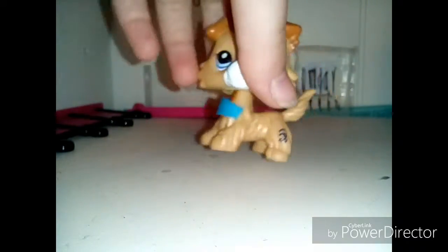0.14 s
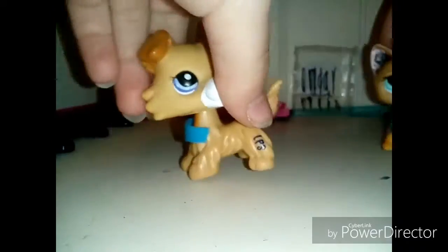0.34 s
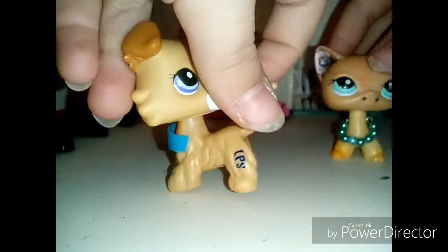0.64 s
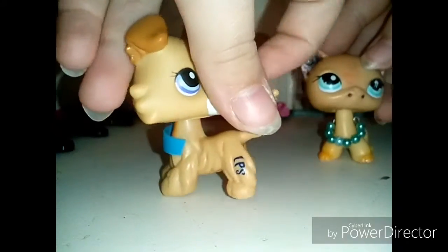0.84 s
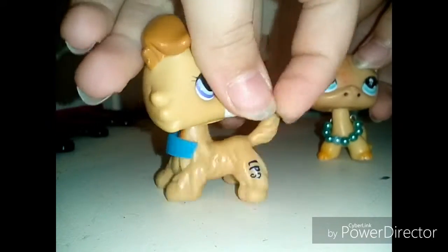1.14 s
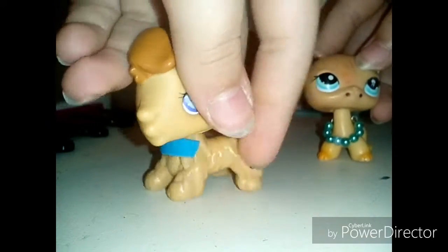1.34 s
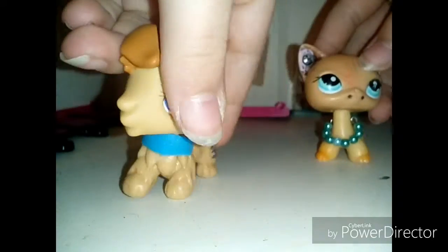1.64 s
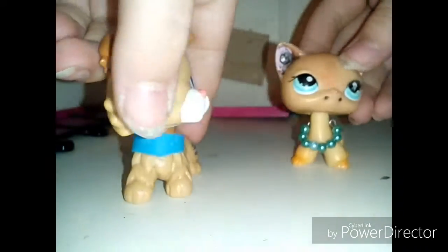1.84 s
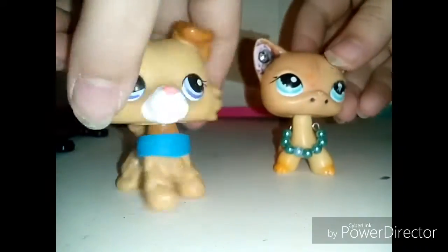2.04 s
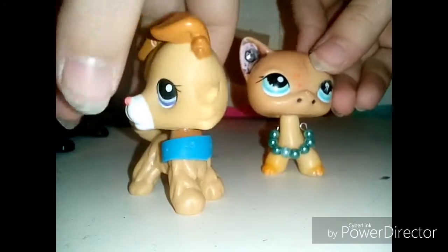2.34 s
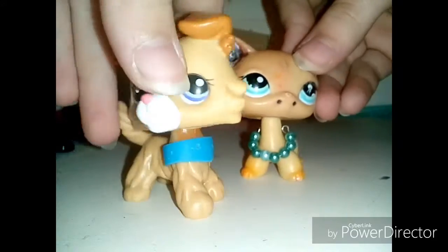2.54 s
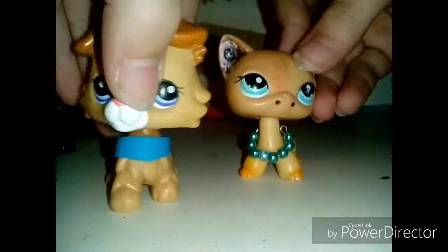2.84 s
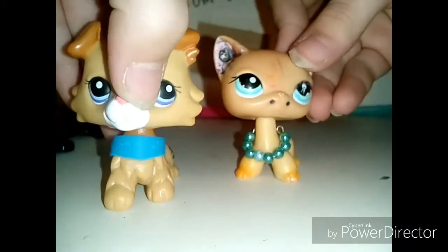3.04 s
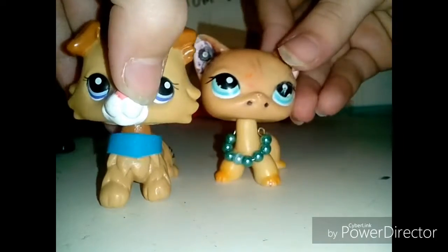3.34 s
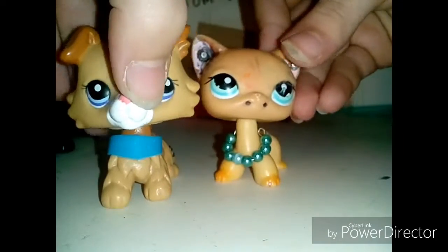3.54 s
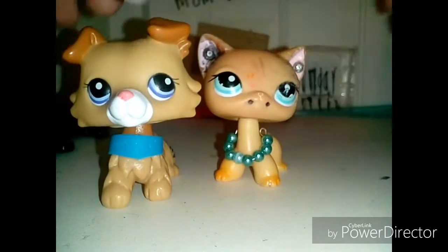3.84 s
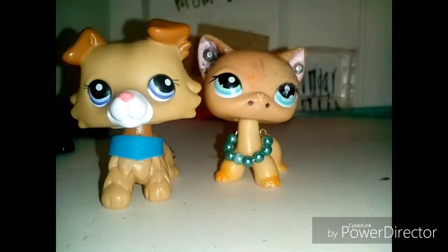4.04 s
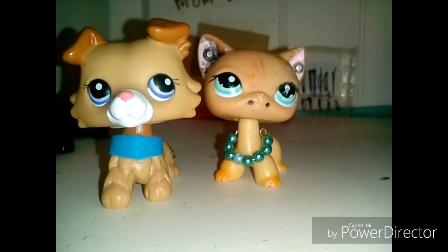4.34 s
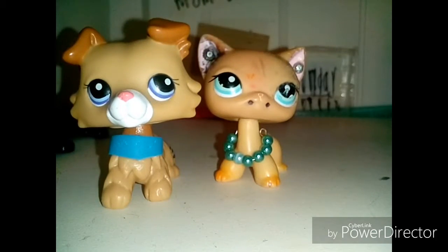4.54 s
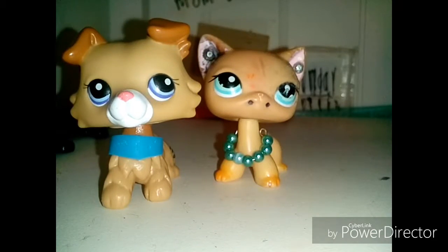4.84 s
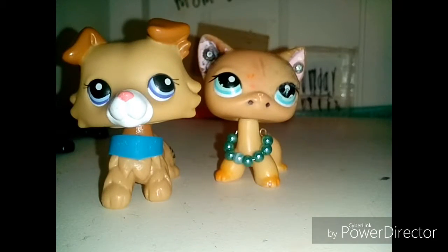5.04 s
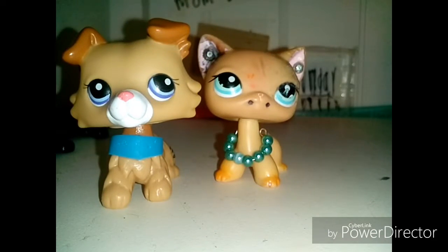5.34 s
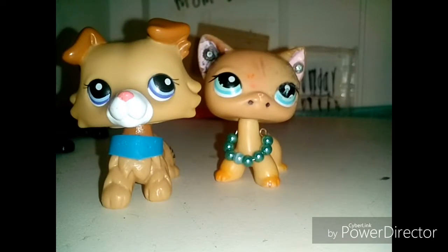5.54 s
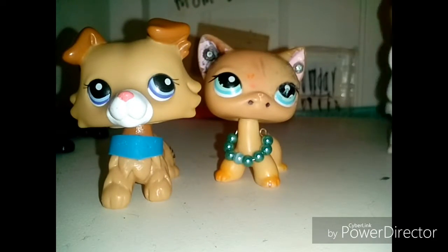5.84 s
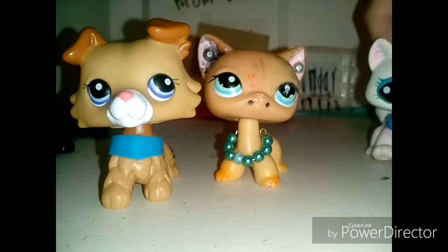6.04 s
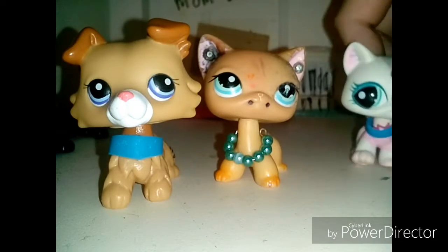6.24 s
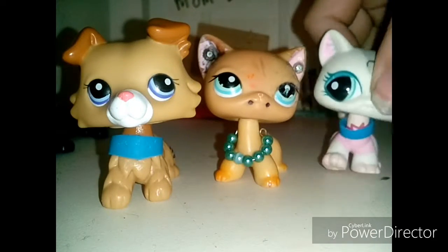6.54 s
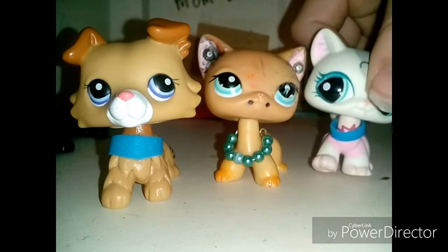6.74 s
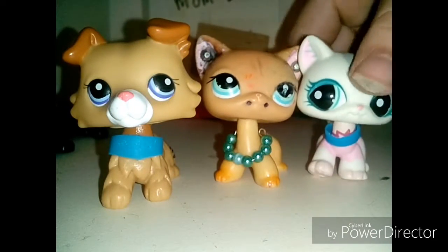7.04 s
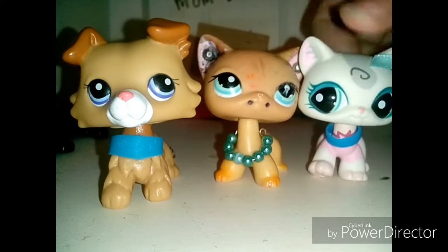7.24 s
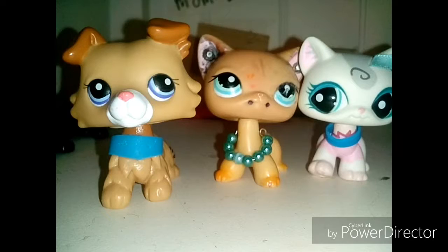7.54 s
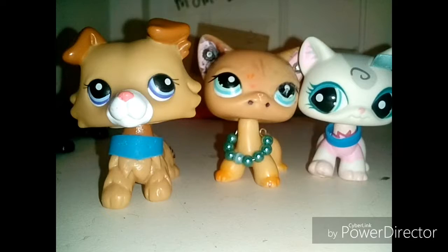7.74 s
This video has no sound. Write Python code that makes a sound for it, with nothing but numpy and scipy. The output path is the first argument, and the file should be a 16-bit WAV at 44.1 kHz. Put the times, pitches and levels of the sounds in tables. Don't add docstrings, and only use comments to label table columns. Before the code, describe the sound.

A small, fairly dry room with low fridge-like hum and faint hiss, captured close by a two-port phone. From 0 to 0.7 s, hard hollow plastic toy feet strike a hollow shelf in loud bright clacks, the strongest near 0.06, 0.2 and 0.65 s, with gritty scraping between. From 0.8 to 2.2 s come lighter steps, shuffles and drags, with a clear clack at 1.3 s. Firmer knocks fall around 2.3 s, then muffled taps and rubs until 3 s. It quiets, with a knock at 3.7 s. At 4.2-4.4 s a hand lands in a dull, soft slap and brushes away. Small taps and tiny bead-like flicks follow at 4.6-5.1 s. A solid clack at 5.65 s leads to light plastic taps through 6.9 s, then near-silence with faint rubbing and very faint high insect trills.

```python
import sys
import numpy as np
from scipy import signal
from scipy.fft import rfft, irfft, next_fast_len
from scipy.io import wavfile
from scipy.ndimage import uniform_filter1d

SR = 44100
rng = np.random.default_rng(int(sys.argv[2]) if len(sys.argv) > 2 else 0)


def field_ratio(decibels):
    return 10 ** (np.asarray(decibels, dtype=float) / 20)


def persist_wave(psi):
    counts = np.round(np.clip(psi, -1, 1) * 32767).astype(np.int16)
    wavfile.write(sys.argv[1], SR, np.atleast_2d(counts).T)


N = 347508
TIME = np.arange(N) / SR
SPOT_DB = 2.5

# pitch_hz, level_db, t60_s
BOARD = [(122, -19.5, 0.24), (252.2, 5.5, 0.11), (314.7, -2.5, 0.35), (376.6, 8.5, 0.14), (402.1, 5, 0.2),
         (473, -9, 0.045), (640, -4.5, 0.19), (714, -2.5, 0.092), (860, 1.5, 0.023), (1000, -14.5, 0.055),
         (1089, -1, .06), (1250, -18, 0.036), (1366, -27.5, 0.036), (1660, -3, 0.064), (1923, -4, 0.1),
         (2140, -9.5, 0.047), (2430, -22, 0.04), (2519, -18, 0.055), (2600, -9, 0.096), (3600, -9.5, 0.033),
         (3820, 4, 0.025), (4320, -2, 0.018), (5050, 10, 0.017), (5303, -1, 0.028), (5570, -16, .025)]
COLOUR_HZ = (380, 950, 2200, 4500)
# pitch_hz, width_hz, level_db
BIG_HEAD = [(1013, 86, 7.5), (1624, 47, -8), (1880, 63.5, -12.5), (2200, 70, -19), (2840, 43, -5),
            (3707, 72, -5), (5150, 210, -11)]
SMALL_HEAD = [(635, 30, 1), (870, 39, 2), (1270, 60, -7.5), (1910, 60, 1.5), (2250, 54, -1),
              (2810, 120, -14), (3315, 70, -13), (3700, 90, -14)]
SLEEVE = [(1250, 41, -6.5), (1927, 34, 2), (2850, 140, 0), (3310, 90, -9), (3890, 80, -13), (4630, 100, 4),
          (4950, 92, -6.5), (5150, 160, -5)]


def unit(x):
    return x / np.sqrt(np.mean(x ** 2))


def colour(x, points):
    hz, db = np.transpose(points)
    n = next_fast_len(N)
    bins = np.maximum(np.fft.rfftfreq(n, 1 / SR), 1)
    gain = field_ratio(np.interp(np.log(bins), np.log(hz), db))
    return irfft(rfft(x, n) * gain, n)[..., :N]


def band(x, lo_hz, hi_hz):
    return signal.sosfilt(signal.butter(2, (lo_hz, hi_hz), "bandpass", fs=SR, output="sos"), x)


def steep(x, lo_hz, hi_hz):
    return band(band(x, lo_hz, hi_hz), lo_hz, hi_hz)


def resonance(x, hz, width_hz):
    return unit(signal.lfilter(*signal.iirpeak(hz, hz / width_hz, SR), x))


def walk(rate):
    k = int(SR / rate)
    held = np.repeat(rng.standard_normal(N // k + 1), k)
    return .55 * uniform_filter1d(uniform_filter1d(held, k), k)[:N]


def rings(hz, t60, t):
    return np.exp(np.outer(2j * np.pi * hz - np.log(1000) / t60, t))


def grip(t):
    return 0.25 + 0.75 * np.exp(-t / 0.05)


def touch_db(hz, four_db):
    return np.interp(np.log(hz), np.log(COLOUR_HZ), four_db)


def ports(x, s):
    # start_s, left_minus_right_db, left_lead_ms
    place = [(0, 1.5, 0.14), (.5, 5, 0.062), (0.999, 4, 0.28), (1.5, 4, 0.26), (2.301, 3.5, 0.3),
             (2.8, 1.5, 0.43), (3.202, 7, -0.42), (3.699, 1.5, 0.14), (4.3, -1.5, -0.28),
             (4.7, -2.5, -0.095), (5.2, -3, -0.043), (5.7, 7, 0.14), (6.3, 2, 0.072), (6.701, 3, 0.085),
             (7.501, -1, 0.24)]
    when, pan_db, lead_ms = np.transpose(place)
    pan_db = np.interp(s, when, pan_db)
    lag = np.interp(s, when, lead_ms) * SR / 2000
    at = np.arange(x.shape[1])
    return np.array([field_ratio(side * pan_db / 2) * np.interp(at + side * lag - 8, at, c)
                     for side, c in zip((1, -1), x)])


def quiet():
    # pitch_hz, level_db, side_db
    hum_tones = [
        (53.4, -61.5, -10.5),
        (15300, -102, -7),
    ]
    # pitch_hz, density_db
    air_colour = [(20, -22), (42, -27.5), (60, -11.5), (86, -18), (104, -7.5), (122, -6.5), (145, -16.5),
                  (250, -24.5), (450, -28), (1400, -35), (4200, -34.5), (5150, -31), (7900, -43),
                  (16000, -46)]
    mid, left, right = rng.standard_normal((3, N))
    shared = colour(mid, [(200, 3.0), (900, -11.0), (3000, -25.0)])
    alone = colour(np.array([left, right]), [(200, -4.0), (900, -0.5), (3000, -4.5)])
    air = colour(shared + alone, air_colour)
    air = air * field_ratio(-63) / np.std(band(air, 53, 16000))
    air = air * field_ratio(4.5 * walk(2.2) + 2.0 * walk(9))
    hum = np.zeros((2, N))
    for hz, db, side_db in hum_tones:
        phase = np.array([[field_ratio(side_db)], [-field_ratio(side_db)]])
        hum += field_ratio(db + .5 * walk(2.6)) * np.sqrt(2) * np.sin(2 * np.pi * hz * TIME + phase)
    return air + hum


def brushes():
    # centre_s, spread_s, level_db, low_hz, high_hz
    passes = [(4.3, .045, -43, 450, 1200), (2.903, .02, -45, 750, 1400), (4.21, .025, -72, 6500, 15000),
              (5.99, .015, -72, 6500, 14000), (2.19, .03, -76, 6500, 13000), (3.24, .02, -62, 280, 620),
              (1.065, .008, -64, 3400, 4000), (2.55, .03, -70, 4600, 5600), (7.44, .05, -76, 4500, 5600),
              (6.29, .025, -61, 4500, 5700), (2.9, .025, -78, 6500, 13000), (4.32, .05, -46, 100, 700),
              (.02, .015, -62, 2500, 6000), (3.95, .15, -62, 385, 420), (7.3, .12, -63, 250, 450),
              (4.29, .07, -66, 2550, 2720), (.46, .05, -44, 330, 470), (3.24, .03, -58, 250, 400),
              (7.8, .08, -78, 4800, 5500), (7.3, .025, -75, 4800, 5500), (.715, .015, -50, 500, 1500),
              (4.205, .022, -60, 4200, 6400), (1.2, .06, -68, 3620, 3800), (.22, .04, -58, 3000, 6000),
              (1.45, .1, -79, 2750, 2950), (.33, .05, -62, 1600, 1750), (5.99, .015, -58, 2300, 3200),
              (.95, .2, -64, 4900, 5500)]
    hiss, out = rng.standard_normal((2, N)) * field_ratio(3.7 * walk(25)), np.zeros((2, N))
    for s, spread, db, lo_hz, hi_hz in passes:
        near = slice(max(int((s - .25) * SR), 0), int((s + .25) * SR))
        swell = np.exp(-((TIME[near] - s) / spread) ** 2)
        out[:, near] += field_ratio(db) * swell * unit(steep(hiss[:, near], lo_hz, hi_hz))
    return out


def contacts():
    # start_s, peak_db, toy_ring_hz, hardness_db
    clacks = [(.057, -8.5, 2035, 5.5), (.066, -14, 831, -2.5), (.189, -7, 2680, 9.5),
              (.39, -19, 1950, -3.5), (.423, -13, 940.3, 3.5), (1.24, -41, 1030, -16),
              (1.319, -17, 1263, 4.5), (1.854, -47.5, 873, 0.5), (2.276, -13, 1100, -2.5),
              (2.352, -24, 1050, -9), (2.467, -31.5, 939, -5), (2.726, -24, 1026, -14.5),
              (2.878, -35.5, 1055, -13), (2.907, -28, 1078, -3.5), (3.711, -20, 710, -1),
              (4.713, -31.5, 1194, -13.5), (5.654, -15.5, 959, -1.5), (5.861, -28.5, 1790, -6),
              (6.113, -22, 1780, 0.5), (6.343, -30.5, 1960, -1), (6.366, -27.5, 1850, -11),
              (6.562, -33, 1880, -2), (6.606, -21, 1986, 0), (6.859, -53.5, 2220, 5)]
    steps = [(.153, -37, 640, 13), (.48, -32.5, 1050, 5), (.518, -24, 730, -6.5), (.654, -10, 1910, 15.5),
             (.872, -38, 1000, -9), (.989, -31, 1050, 1.5), (1.013, -39.5, 1040, -14),
             (1.218, -41.5, 1055, 0), (1.956, -46, 834, 7), (2.139, -42.5, 1010, -2.5),
             (2.185, -38, 1070, 7), (2.524, -51, 864, -15), (6.669, -36, 824, 0), (1.186, -35.5, 1110, 3),
             (1.349, -43, 877, -8), (1.878, -31.5, 1139, 12), (1.971, -33.5, 1020, -0.5),
             (2.744, -33, 783, -16), (2.893, -43, 1038, -7.5), (4.61, -35.5, 950, -6),
             (4.686, -44, 542, -6), (4.728, -49, 560, -17), (5.642, -16, 980, 6), (6.024, -30.5, 1785, 1.5),
             (6.096, -34.5, 880, -6), (6.209, -38, 860, 9), (6.246, -38, 1940, -6.5),
             (6.338, -32.5, 940, -23), (6.446, -41, 800, 6), (6.467, -33.5, 2090, -1),
             (6.68, -30.5, 1950, 4.5), (6.984, -57.5, 620, -7), (7.399, -62, 859, -2)]
    shuffles = [(.582, -34, 1000, 15.5), (.697, -27.5, 1250, 15), (.785, -52, 616, 14),
                (1.13, -43, 580, -2), (1.5, -39.5, 580, -5), (1.565, -42.5, 1015, -15),
                (1.594, -47.5, 1000, -9.5), (1.685, -37, 1054, 10.5), (1.699, -51, 861, 8),
                (2.097, -37, 1050, 0), (2.309, -36, 1020, 12), (2.44, -40.5, 840, 8),
                (2.638, -40.5, 566, -9), (2.672, -29, 1029, 11), (3.724, -25, 627, 20.5),
                (3.751, -32.5, 624, 16), (3.799, -37.5, 797, -5), (5.87, -35, 654, 16), (5.9, -43, 880, -6),
                (6.139, -36.5, 634, -5), (6.662, -44, 860, -2)]
    thumps = [(.836, -39.5, 710, 13), (1.217, -38.5, 560, 12), (2.004, -33, 1780, 15),
              (2.399, -32.5, 840, 17.5), (2.584, -37.5, 860, 17), (2.774, -38, 855, -16.5),
              (3.421, -39, 595, 0), (3.852, -42.5, 393, -2), (3.925, -46.5, 388, -2),
              (3.977, -48, 390, -8.5), (4.647, -42, 748, -1), (7.197, -50.5, 616, -3.5),
              (7.316, -55, 877, 13)]
    ticks = [(0.5, -37, 3730, 6), (2.284, -32, 600, 6.5), (1.06, -54, 3560, 12), (5.973, -43.5, 1030, 13),
             (5.985, -34.5, 510, 15.5)]
    slaps = [(4.237, -20.5, 337, 9), (4.243, -22, 580, 3), (4.266, -17.5, 593, -25), (4.299, -27, 370, -14),
             (4.311, -28.5, 580, -29), (4.325, -26, 344, -14), (4.351, -34, 370, -11),
             (4.372, -46, 293, -16)]
    # events, thud_db, bite_db, tick_db
    kinds = [(clacks, -9, -2.5, -9.5), (steps, -3, -7, -9.5), (shuffles, -7.5, -26, -28),
             (thumps, 7.4, -17.5, -26), (ticks, -0.5, -36, 0), (slaps, 11.6, -20, -46)]
    return sorted((s, db, hz, thud_db, bite_db + hard_db, tick_db + hard_db)
                  for rows, thud_db, bite_db, tick_db in kinds for s, db, hz, hard_db in rows)


def figure(toy_hz, t, colour_db, spot):
    # (pitch_hz, level_db, t60_s)
    figures = [(960, 1135, [(1047, 7.5, 0.031), (2806, 5, 0.033), (1320, -11, 0.012)]),
               (777, 939, [(656, 0, 0.03), (860, 2.5, 0.02), (1250, -6.5, 0.077), (1860, 2.5, 0.027),
               (2290, -0.5, 0.031)]), (1780, 2150, [(630.6, -4.5, 0.02), (860, -5.5, .06),
               (1250, -3.5, 0.044), (1884, 3.5, .04), (2233, 4.5, 0.029), (4200, 2, 0.016)]),
               (2600, 2750, [(1635, -5, .04), (2690, -2.5, 0.072), (4060, -2.5, 0.03), (5040, -3, 0.029)]),
               (1140, 1170, [(1440, 2, 0.037), (2780, -1.5, 0.025), (3400, 8.5, 0.019), (3950, 2, .02),
               (4720, -0.5, 0.02), (5000, -3, 0.028)]), (1262, 1295, [(858, 5, 0.034), (1612, 4.5, 0.03025),
               (2170, 6, 0.034), (2780, 10, 0.029), (3680, -10, 0.017), (4980, -0.5, 0.022)]),
               (3600, 3850, [(3700, 7.5, .07), (4400, 1, 0.063)])]
    for lo, hi, modes in figures:
        if lo <= toy_hz < hi:
            hz, db, t60 = np.transpose(modes)
            gain = field_ratio(db + SPOT_DB * spot[:len(hz)] + touch_db(hz, colour_db))
            return (gain @ rings(hz, t60, t)).imag * grip(t)
    return 0 * t


def taps():
    lean_s, lean_db = 4.2, -6.5
    attack_s, rattle_s, dense_s = .005, .005, 0.006
    t = np.arange(SR // 6) / SR
    hz, mode_db, t60 = np.transpose(BOARD)
    swell = (1 - np.exp(-np.outer(hz, t) * 2)) * grip(t)
    board, out = rings(hz, t60, t) * swell, np.zeros((2, N + len(t)))
    edges_hz = ((250, 750), (600, 1500), (1500, 3200), (3200, 6400))
    cracks = np.array([10 * steep(1. * (t == 0), *edge) for edge in edges_hz])
    grain = rng.standard_normal((2, 2 * SR))
    dense = np.array([unit(steep(grain[0] + grain, *edge)) for edge in edges_hz])
    hits = contacts()
    chance = rng.standard_normal((len(hits), 3, len(hz)))
    noise = rng.standard_normal((len(hits), 2, len(t)))
    for (s, db, toy_hz, thud_db, bite_db, tick_db), (spot, phase, turn), hiss in zip(hits, chance, noise):
        contact_db = (thud_db, 0, bite_db, tick_db)
        lean = lean_db * (s > lean_s) * (hz < 450)
        gain = field_ratio(mode_db + touch_db(hz, contact_db) + lean + SPOT_DB * spot) * np.exp(1j * phase)
        turned = gain * np.exp(1j * turn * np.minimum(hz / 600, 1))
        ring = (np.array([turned, gain]) @ board).imag / 3
        toy = field_ratio(6.5 + touch_db(toy_hz, contact_db)) * rings(np.array([toy_hz]), .014, t)[0].imag
        toy = toy + figure(toy_hz, t, (0, 0, bite_db, tick_db), spot)
        blow = np.clip((db + 44) / 22, .1, 1)
        onset = 1 - np.exp(-t / attack_s / (1.05 - blow))
        push = field_ratio(-24) * (hiss[0] + .9 * hiss) * np.exp(-t / rattle_s / (1 + .5 * (1 - blow)))
        push *= onset
        push[:, 0] += blow ** 2
        i = int(s * SR)
        mix = field_ratio(np.array([thud_db - 5.5, 0, bite_db, tick_db]))
        blur = np.tensordot(mix, dense[:, :, i % SR:i % SR + len(t)], axes=1)
        blur = field_ratio(-4.5) * blur * np.exp(-t / dense_s)
        strike = signal.fftconvolve(blur + field_ratio(-0.5) * mix @ cracks, push, axes=1)[:, :len(t)]
        tap = field_ratio(-1 - 3.5 * (1 - blow)) * strike + (ring + toy) * onset
        out[:, i:i + len(t)] += ports(tap * field_ratio(db) / np.abs(tap).max(), s)
    return band(out[:, :N], 190, 18000)


def sparks():
    # start_s, peak_db
    tips = [(0.057, -43.5), (0.159, -66), (0.1893, -41.5), (0.392, -59), (0.421, -54), (0.559, -52.5),
            (0.654, -47), (1.3187, -47.5), (1.8777, -45.5), (2.185, -52), (2.2776, -45), (2.3046, -49.5),
            (4.1977, -54.5), (5.129, -67.5), (5.642, -45), (5.875, -56), (5.987, -53), (6.118, -61),
            (6.447, -64)]
    s, db = np.transpose(tips)
    pan_db = np.array([[1], [-1]]) * 14.5 / 2
    kicks = np.zeros((2, N))
    kicks[:, (s * SR).astype(int)] = field_ratio(db + pan_db)
    fade = np.zeros((2, N))
    for level_db, fade_s in ((0, .004), (-24.5, .04)):
        fade += field_ratio(level_db) * signal.lfilter([1], [1, -np.exp(-1 / (fade_s * SR))], kicks)
    return .5 * fade * unit(band(rng.standard_normal((2, N)), 7000, 12500))


def room(x):
    t60_s, top_hz = 0.18, 4833
    t = np.arange(SR // 3) / SR
    tail = band(rng.standard_normal((2, len(t))), 49, top_hz)
    tail = tail * np.exp(-np.log(1000) * t / t60_s) * (t > .003)
    tail = tail / np.sqrt((tail ** 2).sum(axis=1, keepdims=True))
    return field_ratio(-14.5) * signal.fftconvolve(x, tail, axes=1)[:, :N]


def strokes():
    # start_s, length_s, drone_db, scrape_over_drone_db, rustle_over_drone_db
    pulls = [(0.085, 0.23, -60, 1.5, -6), (0.404, 0.12, -45, 1, -12.5), (0.623, 0.23, -46, -9, -27),
             (0.837, 0.21, -57, -5.5, -31), (1.11, 0.24, -57.5, -8, -21), (1.325, 0.11, -80, -21, -1.5),
             (1.484, 0.03, -53.5, -18, -15), (1.848, 0.3, -55.5, -1, -16), (1.982, 0.41, -50.5, -25, -25),
             (2.137, 0.1, -55, 6.5, -4.5), (2.347, 0.38, -61, -20, -25), (2.613, 0.13, -50, -10, -21),
             (2.869, 0.053, -59, 10.5, 1), (2.949, 0.14, -53.5, -14.5, -18), (3.347, 0.11, -56, -10, -16),
             (3.719, 0.34, -63.5, -10, -9.5), (4.041, 0.27, -66, -3, 0), (4.586, .17, -58.5, -18, -20),
             (5.642, 0.22, -61, -5, -11), (5.829, 0.85, -72.5, -6, -3), (6.235, 0.51, -64, -4.5, -5.5),
             (6.844, 0.14, -81.5, 0.5, -7.5), (7.18, 0.35, -71.5, -17, -21.5), (7.729, 0.26, -86, -4.5, 11)]
    resting_db = (-84.5, -83, -86)
    attack_s, sag_db, release_s = 0.033, -4, 0.045
    s, length, db, scrape_db, rustle_db = np.transpose(pulls)[:, :, None]
    coarse = TIME[::64]
    age = coarse - s
    shape = np.clip(age / attack_s, 0, 1) * field_ratio(db + sag_db * np.clip(age / length, 0, 1))
    shape = shape * np.exp(-np.maximum(age - length, 0) / release_s)
    envelopes = []
    for rest_db, over_db in zip(resting_db, (0, scrape_db, rustle_db)):
        power = field_ratio(rest_db) ** 2 + ((field_ratio(over_db) * shape) ** 2).sum(axis=0)
        envelopes.append(np.interp(TIME, coarse, np.sqrt(power)))
    return envelopes


def slide():
    # pitch_hz, width_hz, level_db
    rub = [(1050, 60, -10.5), (1827, 40, -4), (2330, 140, -7), (2680, 46, -2.5), (3310, 140, -14.5),
           (3620, 140, -9.5)]
    grit = rng.standard_normal((3, N)) * field_ratio(5 * walk(27) + 3 * walk(250))
    grit *= 1 + .7 * uniform_filter1d(1. * (rng.random(N) < 30 / SR), size=250) * 250
    grit = grit[0] + 0.87 * grit[1:]
    drone, scrape, rustle = np.zeros((3, 2, N))
    for hz, db, t60 in BOARD[1:]:
        layer = drone if hz < 570 else scrape if hz < 3100 else rustle
        layer += field_ratio(db) * resonance(grit, hz, np.log(1000) / t60 / np.pi)
    drone = unit(drone) + field_ratio(-7.5) * unit(steep(grit, 200, 530))
    body = sum(field_ratio(db) * resonance(grit, hz, width) for hz, width, db in rub)
    scrape = unit(scrape) + field_ratio(-2) * unit(body) + field_ratio(-3.5) * unit(steep(grit, 500, 3300))
    skin = unit(steep(rng.standard_normal((2, N)), 4800, 5500))
    rustle = unit(rustle) + field_ratio(13.5) * skin * field_ratio(5.8 * walk(6.9))
    feet = sum(gain * unit(layer) for gain, layer in zip(strokes(), (drone, scrape, rustle)))
    return ports(feet, TIME)


def bumps():
    # start_s, peak_db, pitch_hz
    pushes = [(0.269, -51, 106), (0.699, -38, 136.4), (1.515, -41, 100), (4.262, -32.5, 139.5),
              (4.31, -29.5, 125), (4.365, -32, 137.4), (4.7, -42.5, 132), (6.35, -49, 140),
              (6.65, -44, 122), (0.419, -42, 270), (0.535, -26, 244), (3.719, -24, 240.7),
              (4.329, -34.5, 266), (7.491, -48, 247)]
    t, out = np.arange(SR // 4) / SR, np.zeros(N + SR)
    for s, db, hz in pushes:
        i = int(s * SR)
        ring = rings(np.array([hz]), 0.11, t)[0].imag
        out[i:i + len(t)] += field_ratio(db) * (1 - np.exp(-t / 0.00031)) * ring
    return out[:N]


def drags():
    # (centre_s, spread_s, level_db)
    songs = [
        (BIG_HEAD, [(1.2, 0.027, -65), (1.355, .025, -59.5), (1.92, 0.066, -65), (2.2, 0.048, -57), (2.61, 0.044, -61), (2.74, 0.041, -59.5), (2.9, 0.02, -49), (3.02, 0.047, -55), (3.42, .04, -63), (4.67, 0.045, -71)]),
        (SMALL_HEAD, [(.715, 0.014, -45.5), (.76, 0.036, -53), (.88, 0.096, -60), (2.03, .04, -54.5), (6.88, 0.05, -69), (7.0, 0.029, -73), (7.33, .04, -75)]),
        (SLEEVE, [(4.03, 0.029, -74), (4.13, 0.045, -66), (7.42, 0.026, -74)]),
    ]
    slips = rng.standard_normal((3, N)) * field_ratio(8 * walk(90) + 4 * walk(400))
    slips = slips[0] + 1.3 * slips[1:]
    out = np.zeros((2, N))
    for body, rows in songs:
        for s, spread, db in rows:
            near = slice(int((s - .2) * SR), int((s + .2) * SR))
            song = sum(field_ratio(mode_db) * resonance(slips[:, near], hz, width) for hz, width, mode_db in body)
            out[:, near] += field_ratio(db) * np.exp(-((TIME[near] - s) / spread) ** 2) * unit(song)
    return out


def insect():
    # centre_s, spread_s, level_db
    trills = [(4.12, 0.053, -81), (4.43, .02, -85), (5.38, 0.037, -89), (5.95, .07, -83), (6.86, .02, -86),
              (7.16, 0.1, -84)]
    trill_hz, pulses_per_s = 12000, 62
    turns = np.cumsum(pulses_per_s * (1 + .15 * walk(20))) / SR
    pulses = np.maximum(np.sin(2 * np.pi * turns), 0) ** 2
    bouts = sum(field_ratio(db) * np.exp(-((TIME - s) / spread) ** 4) for s, spread, db in trills)
    return 2 * pulses * bouts * unit(band(rng.standard_normal((2, N)), trill_hz - 350, trill_hz + 350))


def pips():
    # start_s, peak_db, pitch_hz
    flicks = [(4.237, -39, 5030), (4.618, -56, 5340), (4.69, -51, 4900), (4.715, -56, 4960),
              (4.742, -40.5, 5100), (4.75, -51, 5000), (4.902, -58, 4880), (5.127, -43, 5000),
              (5.721, -43, 5100), (5.784, -52.5, 5050), (7.315, -60.5, 5150)]
    t60_s, pan_db = .011, -8
    pair = np.array([1 / 1.07, 1.07])
    t, out = np.arange(SR // 20) / SR, np.zeros(N + SR)
    for s, db, hz in flicks:
        i = int(s * SR)
        ring = rings(hz * pair, t60_s, t).imag.mean(axis=0)
        out[i:i + len(t)] += field_ratio(db) * (1 - np.exp(-t / 0.0005)) * ring
    return out[:N] * field_ratio(np.array([[1], [-1]]) * pan_db / 2)


def scene():
    # pitch_hz, left_minus_right_db
    port_tilt = [(100, 4.5), (400, 1), (700, -3), (1300, -2), (2400, -5.5), (4500, -14.5), (6000, -12),
                 (7400, 9.5)]
    toys = colour(taps() + slide() + drags() + pips(),
                  [(40, -18.5), (120, 16.5), (220, -6.0), (300, 2.5), (6000, 1.0), (7200, -9), (8500, -24.5)])
    toys = toys + bumps()
    toys = toys + room(toys)
    tilt = np.array(port_tilt) * (1, .5)
    toys = np.array([colour(toys[0], tilt), colour(toys[1], tilt * (1, -1))])
    return toys + sparks() + brushes() + insect() + quiet()


def band_limit(x):
    return signal.sosfilt(signal.butter(12, 16540, fs=SR, output="sos"), x)


def record(dry):
    rounded = np.tanh(1.5 * dry) / 1.5
    cut = signal.sosfilt(signal.ellip(6, .5, 17, 15500, fs=SR, output="sos"), rounded)
    return band_limit(cut)


dry = scene()
out = record(dry)
persist_wave(out)
```